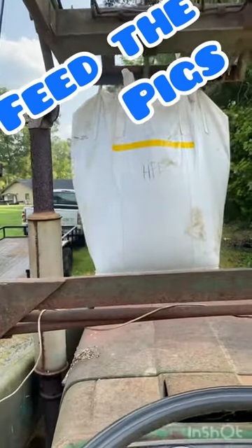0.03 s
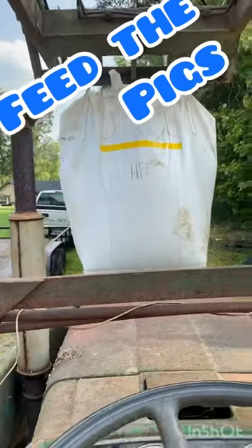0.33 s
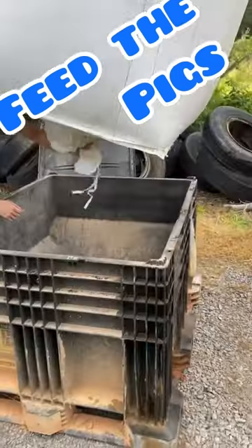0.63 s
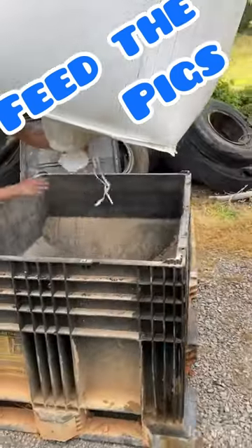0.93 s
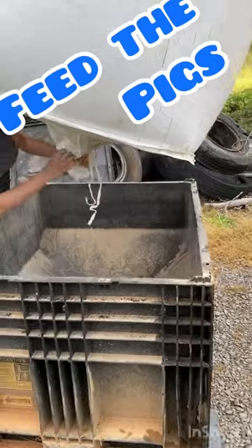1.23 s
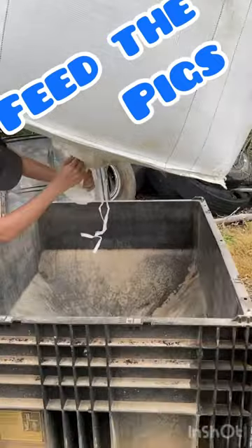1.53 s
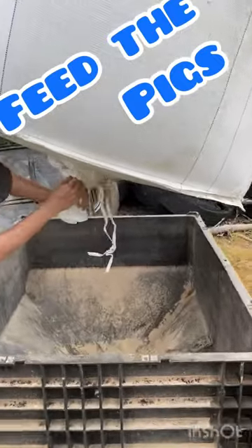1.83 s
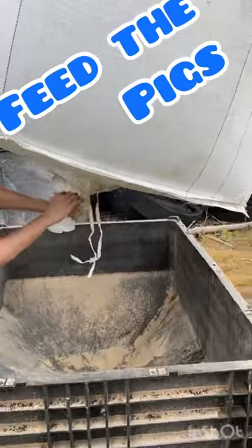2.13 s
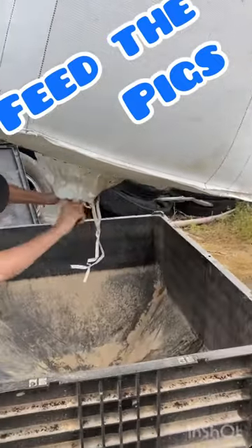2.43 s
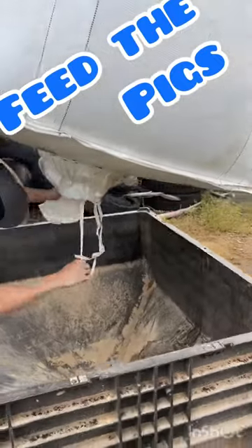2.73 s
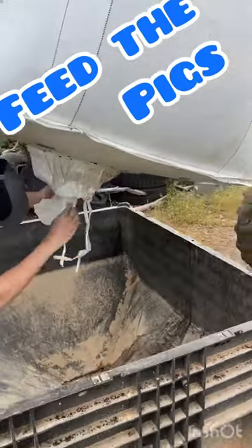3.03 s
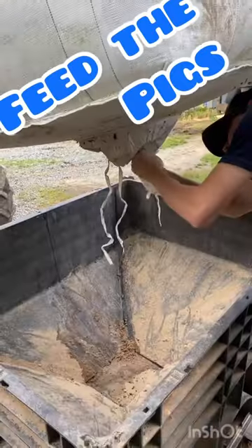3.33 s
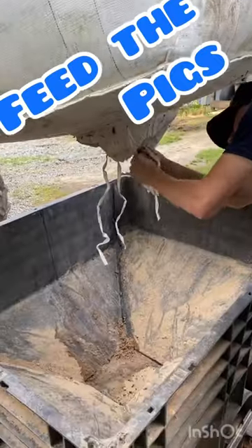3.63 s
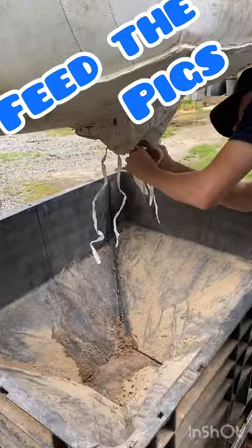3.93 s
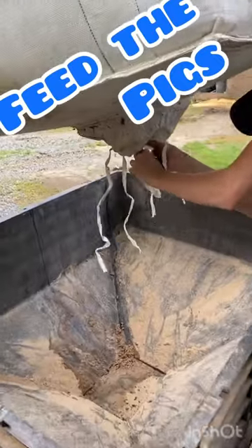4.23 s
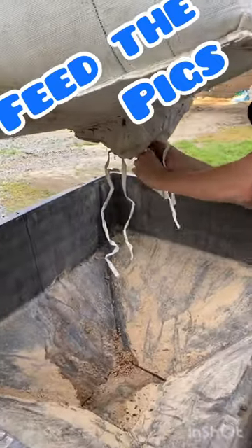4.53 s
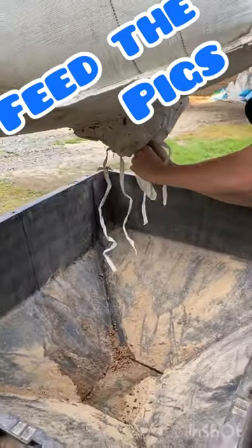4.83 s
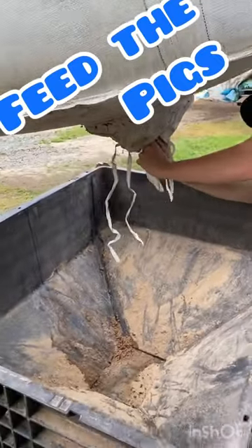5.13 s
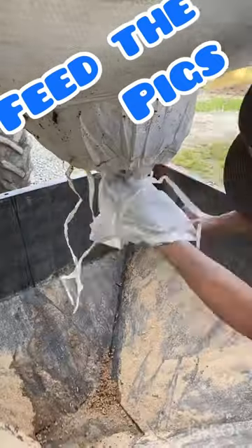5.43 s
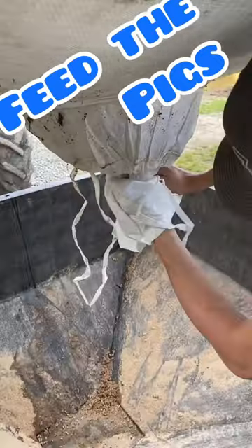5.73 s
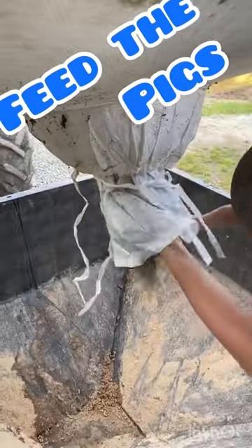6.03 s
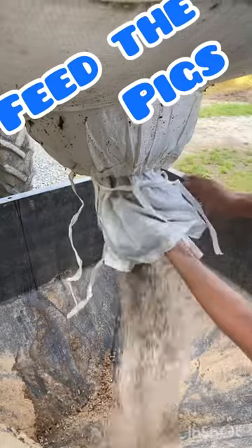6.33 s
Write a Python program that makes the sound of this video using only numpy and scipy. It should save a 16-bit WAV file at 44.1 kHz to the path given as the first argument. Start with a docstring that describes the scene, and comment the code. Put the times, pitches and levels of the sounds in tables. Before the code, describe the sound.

A three-cylinder diesel tractor idles outdoors throughout, with an even exhaust throb, knocking, ticking valves and rattling loose panels. It starts loud and boomy, heard from the seat, with a couple of small clinks. At about 0.5 seconds it drops to a quieter clatter heard beside a feed bin, and its tone shifts abruptly again at 3.1 and 5.5 seconds. Light wind buffets the microphone around 1.3, 2.4 and 5.3 seconds, with dull little bumps near 2.6 and 3 seconds. Fingers pick faintly at a bag's tie at 4 and 5.3 seconds. From 5.5 seconds the woven plastic spout crinkles and snaps close by, while feed begins sliding inside it. At about 6.2 seconds the pellets break free and pour into the plastic bin in a sudden, loud, grainy rush that lasts for the brief remainder.

```python
"""A three-cylinder diesel tractor idles, heard from the seat, then from three places round a feed bin.
Each firing throbs in the exhaust and knocks in the block; the casing clunks, valves tick and loose
panels ring in step with the cycle. Wind buffets the microphone. At the end the woven spout of a bulk
bag is rustled open and feed pellets pour into the plastic bin."""
import sys
import numpy as np
from scipy import signal
from scipy.fft import rfft, irfft, next_fast_len
from scipy.io import wavfile
from scipy.ndimage import uniform_filter1d, minimum_filter1d

SR = 44100
rng = np.random.default_rng(int(sys.argv[2]) if len(sys.argv) > 2 else 0)


def generate_wav(signal):
    """Clip the signal to [-1, 1] and save it as 16-bit WAV at the path in sys.argv[1]."""
    frames = np.transpose(np.atleast_2d(signal))
    scaled = np.clip(frames, -1, 1) * 32767
    pcm = np.round(scaled).astype(np.int16)
    wavfile.write(sys.argv[1], SR, pcm)


N = 281799
TIME = np.arange(N) / SR
TAIL = np.arange(SR // 6) / SR

# listening places: start/s, fade-in/s, a firing of cylinder one/s, engine cycle/s
PLACES = [(0, .001, .132, .1893), (.451, .014, .629, .1837), (3.143, .018, 3.185, .1843),
          (5.469, .006, 5.4725, .1844)]
# per place: throb/dB, boom/dB, drone/dB, knock/dB, tick/dB, valve lead/cycle, leftward lean/1
ENGINE_MIX = [(-19, -17, -22.5, -28.5, -32.5, .012, 0), (-26.5, -40, -30.5, -38, -39.5, .008, 0.05),
              (-26, -60, -34.5, -39, -39.5, .031, 0.32), (-26, -41.5, -35.3, -47, -43.5, 0.034, 0.21)]
# knock per cylinder: relative level/dB
CYLINDER_DB = [5, 3.5, -2.5]
# spectrum of feed against spout or bin wall: f/Hz, relative level/dB
FEED_CONTACT = [(200, -15), (400, 0), (950, 6.5), (1400, 3.5), (1900, 5.5), (2800, -3.5), (5000, -7),
                (12000, -37)]
CYCLE_S = PLACES[2][3]
RELEASE_S = 6.24  # feed breaks free


def undb(db):
    """Decibels to gain."""
    return 10 ** (np.asarray(db) / 20)


def level(x, db=0):
    """Set the rms level."""
    return x * undb(db) / np.sqrt(np.mean(x ** 2))


def noise(size=N):
    """Two independent noises: direct and scattered sound."""
    return rng.standard_normal((2, size))


def colour(x, points):
    """Filter by a spectrum: f/Hz, gain/dB."""
    hz, db = np.transpose(points)
    size = next_fast_len(N + 4096, real=True)
    bin_hz = np.maximum(np.fft.rfftfreq(size, 1 / SR), 1)
    gain = undb(np.interp(np.log(bin_hz), np.log(hz), db))
    return irfft(rfft(x, size) * gain, size)[..., :N]


def carried(x, spectra, where):
    """Colour x for the seat, left of the bin, right of it (last two places); unit rms each."""
    return np.choose(np.minimum(where, 2), [level(colour(x, points)) for points in spectra])


def fade(t60_s, attack_s):
    """Envelope of one blow."""
    return (1 - np.exp(-TAIL / attack_s)) * np.exp(-np.log(1000) * TAIL / t60_s)


def ring(x, response):
    """Convolve with one impulse response, or one per channel."""
    if response.ndim > 1:
        return np.array([ring(x, row) for row in response])
    return signal.oaconvolve(x, response)[:N]


def bursts(rows, t60_s, rise_s=.0001):
    """Envelope of sudden releases; rows: t/s, level/dB."""
    out = 0
    for start_s, db in rows:
        age_s = np.maximum(TIME - start_s, 0)
        out += undb(db) * (1 - np.exp(-age_s / rise_s)) * np.exp(-np.log(1000) * age_s / t60_s)
    return out


def grains(per_s, spread_db, t60_s, spectrum):
    """Tiny random impacts of unequal size, each a short noise tail."""
    sizes = undb(spread_db * np.minimum(rng.exponential(size=N), 3))
    hits = (rng.random(N) < per_s / SR) * sizes
    power = np.maximum(ring(hits ** 2, fade(t60_s, 1 / SR) ** 2), 0)
    return level(colour(np.sqrt(power) * noise(), spectrum))


def evened(x, edges_hz, passes=3):
    """Flatten a noise loop's envelope band by band, keeping its spectrum."""
    size, spectrum = x.shape[-1], rfft(x)
    hz, out = np.fft.rfftfreq(size, 1 / SR), 0
    for low, high in zip(edges_hz[:-1], edges_hz[1:]):
        inside = spectrum * ((hz >= low) & (hz < high))
        band = irfft(inside, size)
        for _ in range(passes):
            steady = np.cos(np.angle(signal.hilbert(band)))
            band = irfft(np.abs(inside) * np.exp(1j * np.angle(rfft(steady))), size)
        out += band
    return out


def strikes(cycles, phase, scatter_db):
    """One impulse per engine cycle at this phase."""
    at = np.flatnonzero(np.diff(np.floor(cycles - phase)) == 1)
    hits = np.zeros(N)
    hits[at] = undb(scatter_db * rng.standard_normal(len(at)))
    return hits


def clatter(cycles, blows_db, t60_s, repeat, attack_s, crack_db, scatter_db, wash_db):
    """Evenly spaced blows ring dense modes, part repeating, part new, over a steady wash."""
    crack = fade(t60_s=.011, attack_s=.00053)
    slap = undb(-12) * np.interp(TAIL - .0062, TAIL, crack)  # second crack, metal on metal
    body = fade(t60_s, attack_s) * (1 - np.exp(-TAIL / attack_s))
    same, envelope = 0, 0
    for k, db in enumerate(blows_db):
        hits = strikes(cycles, k / len(blows_db), scatter_db)
        shape = undb(db) * (body + undb(crack_db) * (crack + slap))
        same += ring(hits, shape * noise(len(TAIL)))
        envelope += ring(hits, shape)
    blows = np.sqrt(repeat) * same + np.sqrt(1 - repeat) * envelope * noise()
    return level(blows) + undb(wash_db) * noise()


def wind(breeze_db=-39.5):
    """Low buffets on the microphone over a faint steady rumble."""
    # rumble: f/Hz, relative level/dB
    spectrum = [(20, -23), (40, 0), (65, 2), (110, -8), (200, -14.5), (400, -35), (1200, -58)]
    # gusts: centre/s, length/s, level/dB
    gusts = [(1.228, 0.13, -32), (1.462, 0.28, -31.5), (2.243, 0.1, -29), (2.633, 0.072, -27),
             (3.0, .25, -49), (5.19, 0.12, -30), (5.386, 0.086, -29)]
    swell = sum(undb(db) * np.exp(-(2 * (TIME - s) / length_s) ** 2) for s, length_s, db in gusts)
    return level(colour(rng.standard_normal(N), spectrum)) * (swell + undb(breeze_db))


def taps():
    """Single blows, each ringing at one pitch."""
    # a loose part by the seat, later a pellet in the bin: t/s, f/Hz, level/dB, t60/s
    clinks = [(.199, 2300, -23, .035), (.387, 2310, -14, .045), (.387, 2200, -20, .08),
              (6.273, 5740, -13, 0.066)]
    # dull bumps on the microphone: t/s, f/Hz, level/dB, t60/s
    bumps = [(2.573, 169, -15, 0.028), (2.965, 187, -8, 0.026), (5.895, 189, -18, 0.091)]
    out = np.zeros(N + len(TAIL))
    for start_s, hz, db, t60_s in [*clinks, *bumps]:
        tone = fade(t60_s, attack_s=.0019) * np.sin(2 * np.pi * hz * TAIL)
        out[int(start_s * SR):][:len(TAIL)] += undb(db) * tone
    return out[:N]


def bag(grip_s=5.47, pull_s=5.827, tighten_db_per_s=53, slacken_db_per_s=15, slide_db_per_s=15.5):
    """Woven plastic crinkles and snaps with the pull; ever more feed slides inside the spout."""
    # fabric: f/Hz, relative level/dB
    weave = [(400, 1), (1200, -14), (2500, 1), (4000, 1.5), (5600, 5), (8000, 0.5), (9600, 0.5),
             (12000, -3), (14500, -13), (16000, -21)]
    # buckling creases: t/s, then relative click/dB, fold crack/dB, thread fizz/dB
    creases = [(5.503, -30, -40, -46), (5.5352, -33, -41, -47), (5.5507, -22, -28, -42),
               (5.5691, -26, -26, -31), (5.6027, -13, -23, -22), (5.6194, -24, -19, -35),
               (5.641, -17, -19, -29), (5.698, -24, -24, -29), (5.7444, -14, -15.5, -27),
               (5.789, -4, -16, -24), (5.802, -24, -24, -33), (5.8265, -19, -20, -21),
               (5.8714, -14, -15, -18.5), (5.882, -18, -21, -23), (5.937, -4, -22, -27),
               (5.9673, -13, -13.5, -19), (6.005, -14, -17, -32), (6.017, -19, -16, -32),
               (6.028, -22, -20, -30), (6.044, -22, -18, -25), (6.0924, -17, -14.5, -22),
               (6.14, -22, -26, -30), (6.1484, -12, -18, -23), (6.166, -20, -23, -28),
               (6.213, -18, -20, -19), (6.229, -17, -17, -20)]
    # fingers pick at the tie: t/s, level/dB
    picks = [(4.015, -34.5), (4.04, -38), (4.075, -38), (5.334, -36), (5.397, -35), (5.457, -44)]
    held = (TIME >= grip_s) & (TIME < RELEASE_S)
    slack_db = np.maximum(tighten_db_per_s * (pull_s - TIME), slacken_db_per_s * (TIME - pull_s))
    # folds and threads crinkle independently, so the colour shifts
    fold, thread = [(5000, 0), (8000, -5)], [(5000, -7), (8000, 2)]
    crinkles = sum(colour(grains(650, spread_db=4.8, t60_s=.022, spectrum=weave), tilt)
                   for tilt in (fold, thread))
    rustle = held * undb(-29.5 - slack_db) * crinkles
    slide = grains(1200, spread_db=2.5, t60_s=.028, spectrum=FEED_CONTACT)
    slide *= held * undb(-24.5 - slide_db_per_s * (RELEASE_S - TIME))
    at_s, click_db, crack_db, fizz_db = np.transpose(creases)
    click = level(colour(noise(), weave), db=-4) * bursts(zip(at_s, click_db), t60_s=.005)
    crack = level(colour(colour(noise(), weave), fold), db=-3.5)
    crack *= bursts(zip(at_s, crack_db), t60_s=.06, rise_s=.0012)
    fizz = level(colour(colour(noise(), weave), thread), db=2)
    fizz *= bursts(zip(at_s, fizz_db), t60_s=.06, rise_s=.0015)
    picking = level(colour(noise(), [(1500, -5), (4000, 2), (5500, -2), (9000, -6), (15000, -29)]))
    picking *= bursts(picks, t60_s=.15, rise_s=.0017)
    return rustle + slide + click + crack + fizz + picking


def pour(stream_db=-16.5, rise_s=.008, ease_db_per_s=24, wall_db=-12):
    """Pellets rush into the bin, easing as its floor is covered; some knock on the wall."""
    # pellet impacts: f/Hz, relative level/dB
    spectrum = [(120, -31), (350, 2), (650, -0.5), (1000, -1.5), (1700, 3), (2600, 1.5), (4000, 2.5),
                (5500, 5), (8000, 0), (10000, 3), (12500, -4.5), (16000, -33)]
    # clumps landing on top of the stream: t/s, level/dB
    clumps = [(6.249, -11), (6.275, -23), (6.326, -25)]
    age_s = np.maximum(TIME - RELEASE_S, 0)
    flow = undb(stream_db - ease_db_per_s * age_s) + bursts(clumps, t60_s=.049, rise_s=.0019)
    flow *= 1 - np.exp(-age_s / rise_s)
    wall = undb(wall_db) * grains(810, spread_db=-6, t60_s=.025, spectrum=FEED_CONTACT)
    stream = grains(12000, spread_db=1.2, t60_s=.016, spectrum=spectrum)
    return (stream + wall) * flow


def hum(cycles, where, waver_db=4):
    """Overtones of the firing rate stand out as clean tones of wavering level."""
    # tones: firing harmonic, seat/dB, left of bin/dB, right of bin/dB
    overtones = [(16, -41, -51, -46), (20, -35, -46.5, -46.5)]
    out, knots_s = 0, np.arange(0, 7, .09)
    for k, *dbs in overtones:
        drift_db = waver_db * np.interp(TIME, knots_s, rng.standard_normal(len(knots_s)))
        gain = undb(np.array(dbs)[np.minimum(where, 2)] + drift_db)
        out += gain * np.sin(2 * np.pi * k * len(CYLINDER_DB) * cycles)
    return out


def drone(cycles, where, repeat=.68, swell=.093):
    """Block and gears churn through nearly the same even rumble each cycle."""
    # rumble at the seat, left of bin, right of bin: f/Hz, relative level/dB
    spectra = [
        [(74, -45), (125, -32), (176, -16), (210, -8.5), (259, -8), (284, -17), (350, -8), (559, -9),
         (639, -16), (695, -9.5), (979, -17), (1500, -19.5), (1950, -20), (3300, -120)],
        [(74, -5.5), (115, -0.5), (150, -0.5), (190, -3.5), (236, -9), (330, -8), (431, -6), (530, -14.5),
         (653, -8.5), (940, -15), (1200, -12.5), (1500, -19.5), (2500, -48.5)],
        [(74, -38), (120, -17), (145, -7.5), (182, -10.5), (215, -11.5), (270, -8.5), (300, -10), (390, -6),
         (445, -6.5), (490, -19), (630, -7), (690, -14), (796, -11), (1090, -18.5), (1500, -22), (2500, -59)],
    ]
    size = int(CYCLE_S * SR)
    loop = evened(noise(size), edges_hz=[0, 270, 520, 950, SR / 2])
    index = (cycles % 1 * size).astype(int) % size
    churn = np.sqrt(repeat) * loop[:, index] + np.sqrt(1 - repeat) * noise()
    churn *= 1 + swell * np.cos(6 * np.pi * (cycles - .19))
    return carried(churn, spectra, where)


def valves(cycles):
    """Valve gear ticks six times a cycle."""
    # two valves per cylinder: relative level/dB
    valve_db = [0, 0.79, -1.3, 0.86, 0, 1.4]
    # tick: f/Hz, relative level/dB
    spectrum = [(1000, 3.5), (2500, 6), (4200, 0), (5500, 3), (6600, -2.5), (8200, -5), (9800, -1),
                (12000, -9), (14000, -10), (16000, -56)]
    ticks = clatter(cycles, valve_db, t60_s=.053, repeat=.9, attack_s=.0049,
                    crack_db=-30, scatter_db=1.5, wash_db=-2.5)
    return level(colour(ticks, spectrum))


def clunks(cycles, where):
    """Heavily damped blows in the casing: a few swings each."""
    # blows: phase/cycle, f/Hz, length/s, seat/dB, left of bin/dB, right of bin/dB
    blows = [(.186, 364.3, 0.018, -31, -25, -25), (.19, 616, 0.021, -22.5, -36, -29.5),
             (.52, 352, 0.019, -26, -28.5, -35), (.535, 216, 0.025, -28, -28, -30.5),
             (.53, 820, 0.017, -33, -37.5, -33.5)]
    out = 0
    for phase, hz, length_s, *dbs in blows:
        swell = np.sin(np.pi * np.minimum(TAIL / length_s, 1) ** .65) ** 2
        hits = strikes(cycles, phase, scatter_db=2)
        out += ring(hits, swell * np.sin(2 * np.pi * hz * TAIL)) * undb(dbs)[np.minimum(where, 2)]
    return out


def panels(cycles, where, pitch_spread=.024, chatter_db=-7):
    """Loose parts clack and chatter once a cycle, each stroke slightly detuned."""
    # modes: phase/cycle, f/Hz, t60/s, seat/dB, left of bin/dB, right of bin/dB
    modes = [(0.02487, 1395, .018, -28, -17, -24.5), (.022, 1443, .022, -32, -23.5, -21.5),
             (.022, 1240, 0.023, -36, -22, -22.5), (0.0179, 2400, 0.028, -36, -30, -31),
             (0.0195, 980, .018, -26, -28, -27), (0.0195, 1900, .012, -30, -26, -30),
             (.11, 1370, 0.037, -28, -24, -29), (.16, 6300, 0.12, -40, -46, -42.5),
             (.348, 1310, .042, -19, -25, -25), (.35, 2000, 0.039, -21, -26, -30.5),
             (.36, 2300, 0.021, -19, -31.5, -37.5), (0.4, 3220, 0.014, -43, -31, -38),
             (0.75, 1410, 0.027, -31, -27, -40), (0.5, 655, 0.061, -26, -33, -30),
             (.84, 263.5, .11, -25, -34, -26), (.82, 5200, 0.046, -34, -45, -43)]
    contact = fade(t60_s=.02, attack_s=.001)
    out = 0
    for phase, hz, t60_s, *dbs in modes:
        mode = fade(t60_s, attack_s=1.46 / hz) * np.exp(2j * np.pi * hz * TAIL)
        hits = strikes(cycles, phase, scatter_db=0)
        chatter = ring(hits, contact / np.linalg.norm(contact)) * rng.standard_normal(N)
        stroke, age = np.divmod(cycles - phase, 1)
        spread = pitch_spread * min(.027 / t60_s, 1) ** 2  # long rings hold their pitch best
        detune = spread * rng.standard_normal(64)[stroke.astype(int)]
        bend = np.exp(2j * np.pi * hz * detune * age * CYCLE_S)
        clack = (ring(hits + undb(chatter_db) * chatter, mode) * bend).imag
        out += clack * undb(dbs)[np.minimum(where, 2)]
    return out


def combustion(cycles, where, ignition_lag_cycles=.014):
    """Ignition cracks, the piston slaps and the block rings."""
    # knock at the seat, left of bin, right of bin: f/Hz, relative level/dB
    spectra = [
        [(600, -37), (1100, 2), (1600, -4), (2200, 4), (2700, -5.5), (3200, -7.5), (4200, -11), (5600, -7),
         (12000, -36)],
        [(600, -8), (1000, -2.5), (1300, 5.5), (1700, 2), (2150, 3), (3000, -3), (4000, -11), (6000, -10),
         (12000, -37)],
        [(600, -1.5), (950, 3), (1400, 9), (1680, -1.5), (2000, 7), (2350, -2), (3000, 1.5), (4000, -5),
         (6000, -30), (12000, -44)],
    ]
    knocks = clatter(cycles - ignition_lag_cycles, CYLINDER_DB, t60_s=.18, repeat=.8, attack_s=.0005,
                     crack_db=-2.5, scatter_db=1, wash_db=-3)
    return carried(knocks, spectra, where)


def exhaust(cycles, peak_phase=.029, smear_rad=.3507, boom_hz=112, boom_s=.046, boom_lead_cycles=.014):
    """A smooth pressure pulse per firing, and the short boom it raises round the seat."""
    # pulse: firing harmonic, relative level/dB
    harmonics = [(1, -40), (2, -74), (3, 4.5), (4, 2), (5, 3.5), (6, -5), (7, -12), (8, -57), (9, -24),
                 (10, -16.5), (11, -21), (12, -10.5), (13, -10.5)]
    cylinders = len(CYLINDER_DB)
    firing_rad = 2 * np.pi * cylinders * (cycles - peak_phase)
    # the silencer delays upper overtones, rounding the pulse
    pulses = sum(undb(db) * np.cos(k * firing_rad - smear_rad * max(k - 4, 0) ** 2)
                 for k, db in harmonics)
    throb = level(pulses) * (1 + .062 * np.cos(2 * np.pi * cycles))
    firings = sum(strikes(cycles, k / cylinders - boom_lead_cycles, scatter_db=2)
                  for k in range(cylinders))
    swell = np.sin(np.pi * np.minimum(TAIL / boom_s, 1)) ** 2  # gone before the next firing: a chug
    boom = ring(firings, swell * np.cos(2 * np.pi * boom_hz * TAIL))
    return throb, level(boom)


def tractor(where):
    """All engine parts follow one slightly wandering crank; rows: direct, scattered."""
    _, _, firing_s, cycle_s = np.array(PLACES)[where].T
    throb_db, boom_db, drone_db, knock_db, tick_db, valve_lead, _ = np.array(ENGINE_MIX)[where].T
    knots_s = np.arange(0, 7, .1)
    wander = .0008 * np.interp(TIME, knots_s, rng.standard_normal(len(knots_s)))
    cycles = (TIME - firing_s) / cycle_s + wander
    out = combustion(cycles, where) * undb(knock_db)
    out += valves(cycles + valve_lead) * undb(tick_db)
    out += drone(cycles, where) * undb(drone_db)
    throb, boom = exhaust(cycles)
    out[0] += throb * undb(throb_db) + boom * undb(boom_db)
    out[0] += panels(cycles, where) + clunks(cycles, where) + hum(cycles, where)
    return out


def scene():
    """Scattered sound widens the picture; by the bin the midrange leans left."""
    # scatter off bin and ground: f/Hz, gain/dB
    scatter = [(60, -19), (200, -27.5), (380, -11.5), (700, -6.5), (1300, -9), (2500, -2), (4400, -4.5),
               (6000, -8.5), (7200, -77), (15000, -70)]
    start_s, fade_in_s, _, _ = np.transpose(PLACES)
    where = np.searchsorted(start_s, TIME, side="right") - 1  # place index per sample
    mid, scattered = tractor(where) + bag() + pour()
    midrange = colour(mid, [(380, -27.5), (650, 9), (1200, 3), (1700, 2.5), (2500, -16), (7000, -36)])
    side = colour(scattered, scatter) + np.array(ENGINE_MIX)[where, -1] * midrange
    mid = mid + wind() + taps()
    # the level dips briefly at each change of place
    dips = np.clip((TIME - start_s[where]) / fade_in_s[where], .12, 1)
    dips = uniform_filter1d(minimum_filter1d(dips, size=65), size=65)
    return dips * np.array([mid + side, mid - side])


def record(dry):
    """The right channel lags in the treble; peaks are rounded and the top is cut."""
    lag_s, from_hz, top_hz = .000161, 4220, 15830
    turn_rad = np.pi * lag_s * np.maximum(np.fft.rfftfreq(N, 1 / SR) - from_hz, 0)
    pair = irfft(rfft(dry) * np.exp(1j * np.array([turn_rad, -turn_rad])), N)
    lowpass = signal.ellip(10, .2, 90, top_hz, fs=SR, output="sos")
    return signal.sosfilt(lowpass, np.tanh(pair))


dry = scene()
out = record(dry)
generate_wav(out)
```